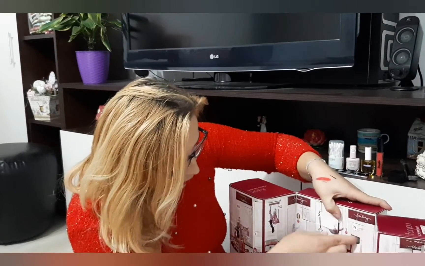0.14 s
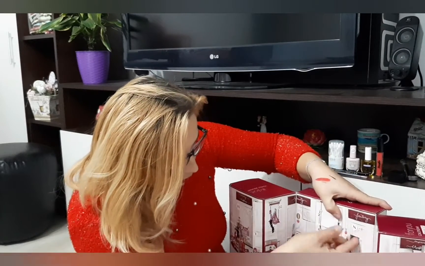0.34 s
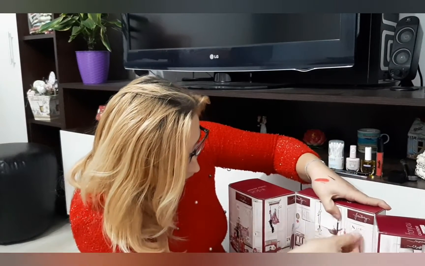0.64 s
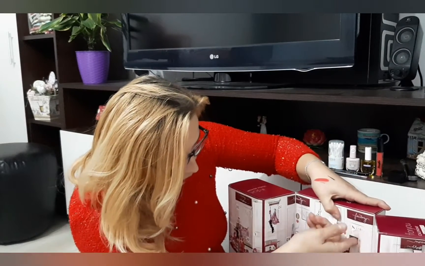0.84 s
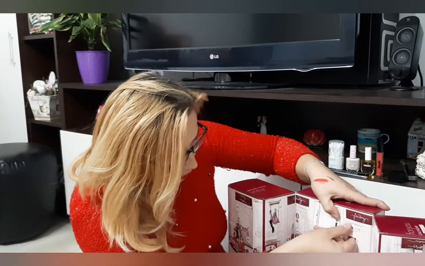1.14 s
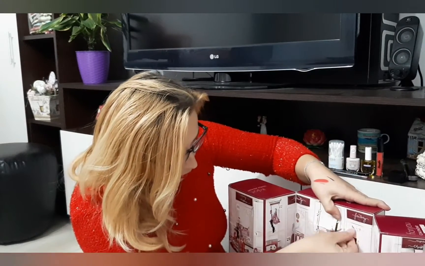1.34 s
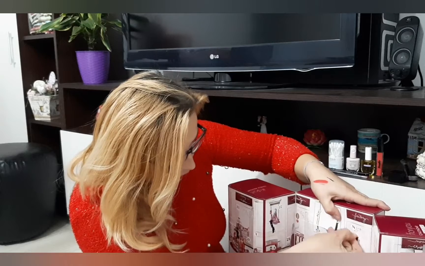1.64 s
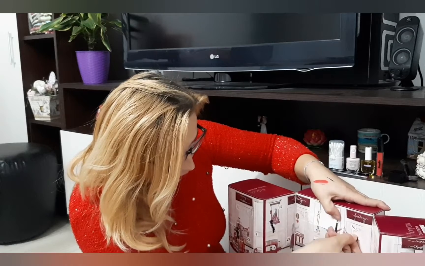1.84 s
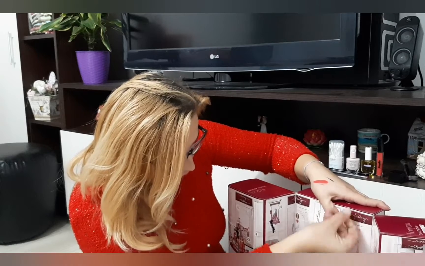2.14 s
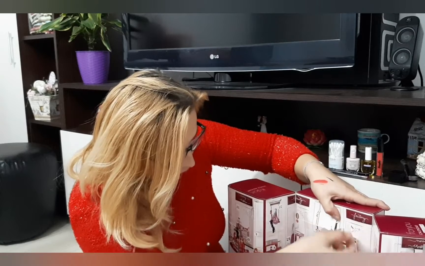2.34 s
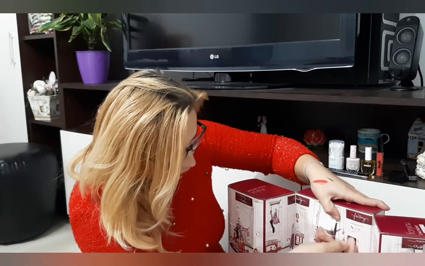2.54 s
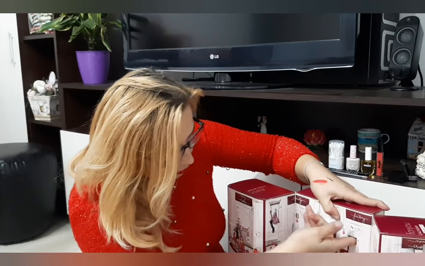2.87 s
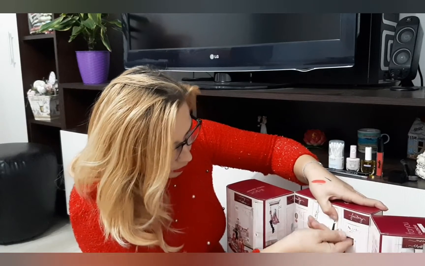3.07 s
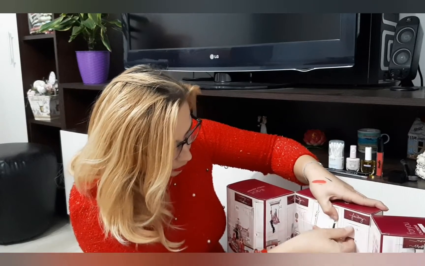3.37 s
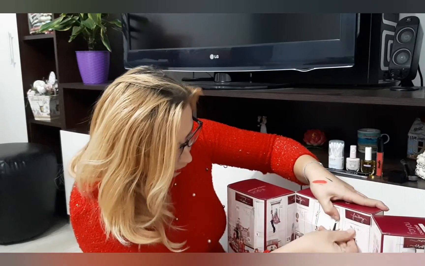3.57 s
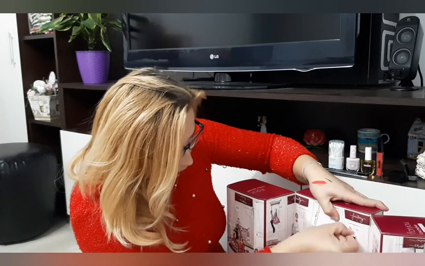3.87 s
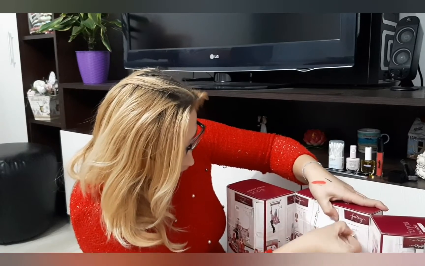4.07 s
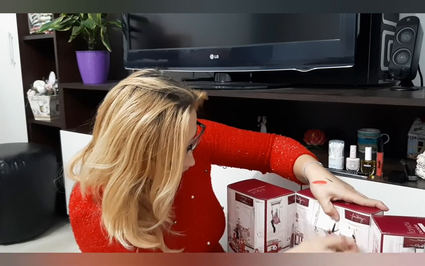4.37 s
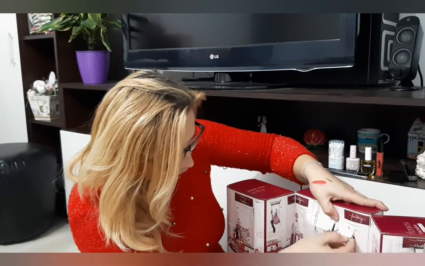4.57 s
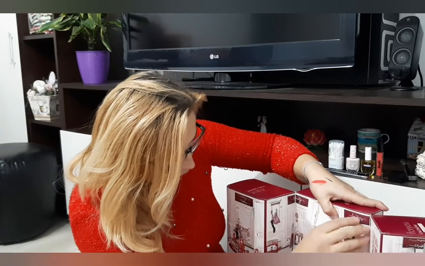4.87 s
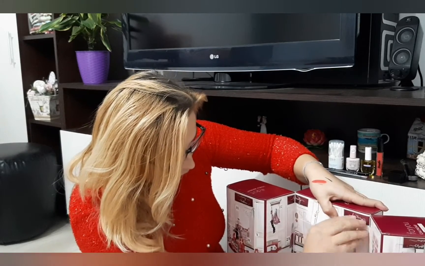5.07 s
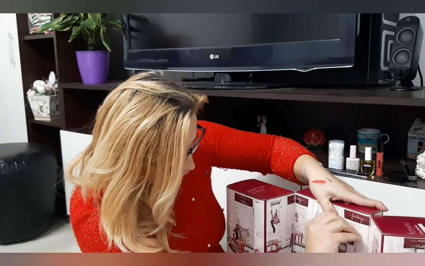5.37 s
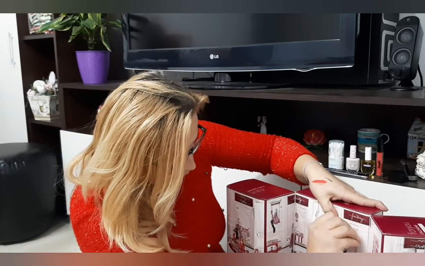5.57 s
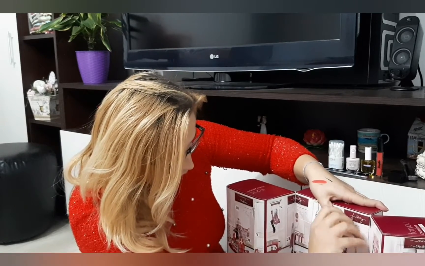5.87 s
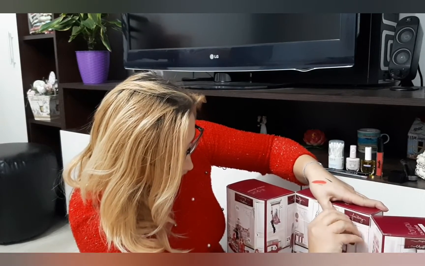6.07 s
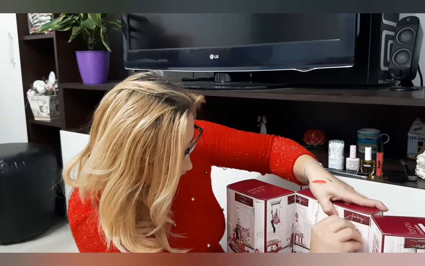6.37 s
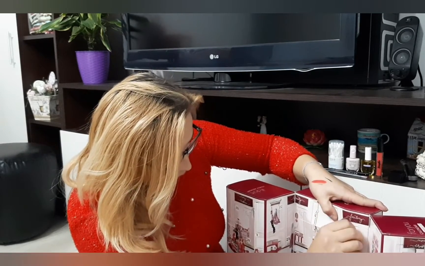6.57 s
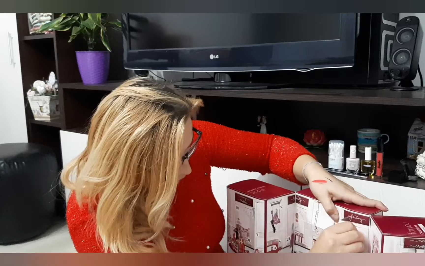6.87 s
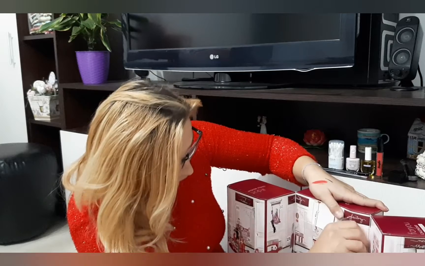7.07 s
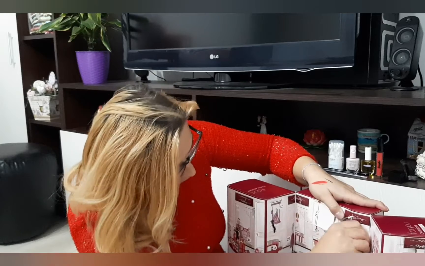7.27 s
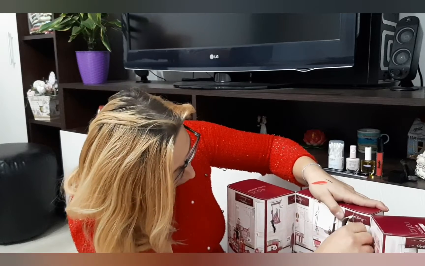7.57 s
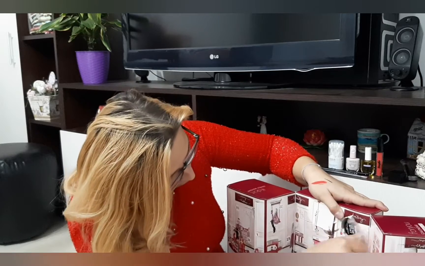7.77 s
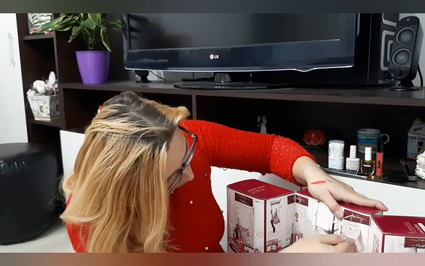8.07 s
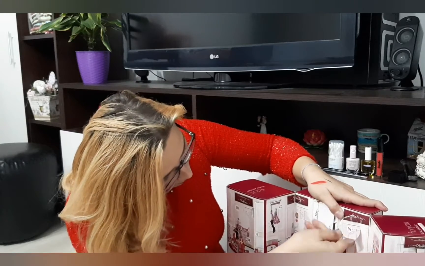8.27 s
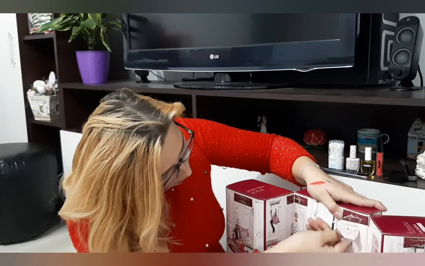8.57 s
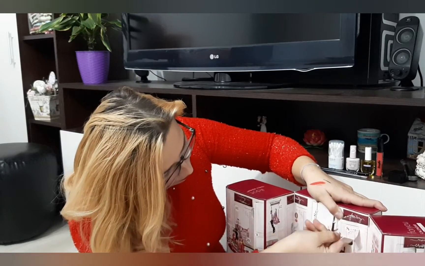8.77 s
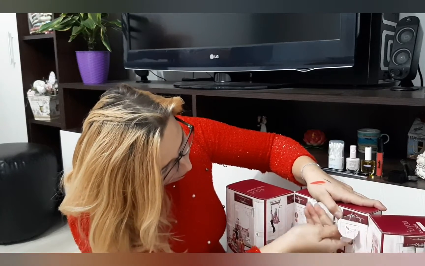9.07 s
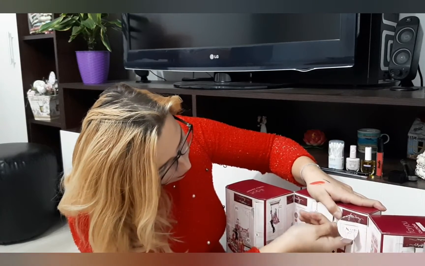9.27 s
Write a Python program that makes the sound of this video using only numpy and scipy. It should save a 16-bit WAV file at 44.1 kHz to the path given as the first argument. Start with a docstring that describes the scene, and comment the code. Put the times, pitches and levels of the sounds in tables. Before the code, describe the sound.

Close, dry fumbling on a hollow card box: nails click, fingertips rub, and perforations snap now and then in a quiet living room.

```python
"""A living room, two close microphones, a hollow cardboard calendar with a perforated door, a little to the right.
From the start a faint floor of air and hiss lies under a hand that keeps brushing the box. Within 0.1 s nails
catch and flick (noise bursts with a click), drag the card (ringing noise) and fingers rub it (stick and slip).
From about 0.5 s paper ties snap now and then among these touches, up to the end at 9.4 s.
Catches, snaps and rubbing ring the box at its hollow modes; every touch leaves a short room tail."""
import sys
import numpy as np
from scipy import signal
from scipy.io import wavfile
from scipy.ndimage import uniform_filter1d

SR = 44100
rng = np.random.default_rng(int(sys.argv[2]) if len(sys.argv) > 2 else 0)


def transcribe(u):
    """Save the signal u as a 16-bit wav file named by the first command-line argument.

    u: samples, shape (n,) or (channels, n), limited to [-1, 1]; the rate is SR.
    q: integer samples, one column per channel.
    """
    v = np.clip(np.atleast_2d(u).T, -1, 1)
    q = np.round(v * 32767).astype(np.int16)
    wavfile.write(sys.argv[1], SR, q)


N = 415510
TIME = np.arange(N) / SR

# All sound is built in half-octave bands below the cutoff: band edges and centres, f/Hz
CUTOFF_HZ = 16000
EDGES = CUTOFF_HZ * 2 ** (np.arange(-17, 1) / 2)
CENTRES = np.sqrt(EDGES[1:] * EDGES[:-1])

# Still air and microphone hiss: f/Hz, level per half octave/dB
AIR_AND_HISS = [(50, -103), (120, -85), (300, -100.5), (700, -96), (1500, -107), (4000, -80),
                (14000, -86.5)]
# Likeness of left and right microphone in sound from all sides: f/Hz, correlation
LIKENESS = [(100, 0.35), (300, 0.92), (600, 0.43), (1200, 0.11), (2500, 0.09), (14000, 0.17)]

# Touch levels below are relative: colours and the mix in scene() are added to them.
# strength: midrange level; weight: bass against midrange, how far the finger flexes the panel;
# sharpness: top octave against midrange, nail edge high, fingertip low.
# Steadying hand brushing the box between strokes: t/s, strength/dB
RESTING_HAND = [(0, -71), (0.72, -78.5), (1.0, -72.5), (2.4, -75), (2.55, -92), (2.8, -70), (3.2, -76),
                (4.3, -57), (4.5, -72.5), (5.3, -73), (5.9, -80), (6.6, -64.5), (6.87, -83), (7.1, -83),
                (7.6, -69.5), (7.88, -94), (8.12, -73.5), (9.2, -74.5)]
RESTING_WEIGHT_DB, RESTING_SHARP_DB = -7.5, -6.5
# Strokes of a finger or nail over the card: t/s, length/s, strength/dB, weight/dB, sharpness/dB
STROKES = [(0.051, .15, -57.5, -3, -25), (0.459, .12, -60, -12, -11.5), (0.8134, .1, -60, -14, -6),
           (0.912, .07, -55, -3, -9.5), (1.026, .33, -57, -4, -15.5), (1.359, .06, -51.5, -8, -9.5),
           (1.475, .08, -63, 1.5, -13), (1.614, .16, -60.5, 3, -4), (1.848, .14, -67.5, -2, -12),
           (2.049, .05, -58, -4.5, -17), (2.133, .09, -49.5, 2.5, -13), (2.58, .14, -73, -12, -11.5),
           (2.872, .04, -64, 2, 0), (2.913, .11, -54, 3, -12.5), (3.269, .13, -69, -7, -15),
           (3.444, .16, -59.5, -9, -13.5), (3.651, .07, -50.5, -14, -15), (3.741, .17, -60, 2, -2.5),
           (3.93, .06, -50, 2.5, -1.5), (4.095, .11, -65, -10, 4.5), (4.209, .08, -49, -18.5, 2),
           (4.298, .07, -50.5, -21, -20), (4.637, .13, -66.5, -8.5, -13), (4.941, .06, -54, -13, -17),
           (5.091, .12, -57.5, -16.5, -20), (5.306, .04, -56, -7, -8.5), (5.433, .07, -59, -14, -6.5),
           (5.508, .11, -64, -10, 1.5), (5.687, .06, -55.5, -24, -15), (5.75, .04, -58, 1.5, -1.5),
           (5.956, 0.13, -63.5, -11, -15.5), (6.12, .14, -59.5, -30, -8.5), (6.32, .04, -52, 0.5, 2),
           (6.442, .14, -67.5, -6, -1.5), (6.68, .11, -62.5, -10.5, 8.5), (6.914, .07, -68, -10.5, 3.5),
           (6.983, .1, -59.5, -4.5, -6), (7.116, .08, -60.5, -17, -2.5), (7.214, .07, -56, -1, 0),
           (7.4216, .12, -65, -31, 5.5), (7.678, .09, -64, -30, 3.5), (7.945, .05, -66.5, -8, -12.5),
           (8.222, .1, -65, -1.5, -7), (8.34, .07, -55.5, -4.5, -10), (8.415, .05, -88, -14, -27),
           (8.532, .14, -61.5, -12, -31), (8.69, .22, -60.5, -19.5, -27), (8.98, .07, -61, -7, -16),
           (9.25, .04, -53, -36, -43), (9.337, .08, -59, -17, -20.5)]
# A stroke swells, eases off as it goes, and dies when the finger lifts
ATTACK_S, EASE_DB, RELEASE_S = .012, 4, .009
# Tick where a stroke lands and random catches on fibres: level against the stroke, half-range of the catches
LANDING_DB, CATCH_DB, CATCH_SPREAD_DB = -1.1, 0.3, 3.5
# Colour of a touch at zero weight and sharpness: f/Hz, level/dB
TOUCH_COLOUR = [(80, -4), (190, 0.3), (280, 1), (420, -0.4), (650, 1.5), (1500, -0.5), (3000, 0), (5000, 1),
                (13000, -1)]
# How much of the weight reaches each frequency: f/Hz, share
WEIGHT_SHARE = [(80, 1.1), (200, 1.01), (350, 0.87), (650, 0.33), (1500, 0.0047)]
# How much of the sharpness reaches each frequency: f/Hz, share
SHARPNESS_SHARE = [(650, -.05), (1700, 0.11), (5000, 0.67), (13000, 1)]
# How the card radiates sliding: f/Hz, level/dB
SLIDE_COLOUR = [(50, -13), (100, -14), (200, -12.5), (350, -2.5), (650, -1.5), (1300, 0), (2800, 2),
                (4500, 4), (6500, 5), (9500, -5), (14000, 10)]

# Nail catches and flicks: t/s, strength/dB, weight/dB, sharpness/dB
CONTACTS = [(0.017, -40.5, -4, -2), (0.0447, -29.5, -8.5, -10.5), (0.08, -38.5, -40, -9.5),
            (0.1255, -32, -22, -10), (0.283, -63, 7, -13), (0.444, -41, -24, -31), (0.562, -55, -7, -34),
            (0.958, -59.5, 8, 1.5), (1.1302, -48.5, -5, -16), (1.158, -45.5, -9, -22),
            (1.386, -44, -12, -12), (1.3966, -37, -21, -18), (1.5475, -54, 4, 2), (1.611, -43, -14.5, -0.5),
            (2.101, -32.5, -11, -13.5), (2.1178, -39, -8.5, -9.5), (2.1207, -25, -10, -18),
            (2.574, -69, -23, -2), (2.6512, -57, -10.5, -44.5), (3.134, -54, -6, -14),
            (3.43, -40.5, -14.5, -22.5), (3.609, -48.5, -5, -28), (3.634, -50, 1.5, -16),
            (3.6444, -31.5, -26, -7.5), (3.756, -63, 13, -10), (3.828, -54, -3, -25),
            (3.924, -38.5, 2, -10.5), (3.942, -33, -25, -13), (4.172, -44, -30, -13),
            (4.5455, -50, -12, -18), (4.624, -35, -25, -17), (4.8837, -53.5, -14, -18.5),
            (4.934, -46.5, -20, -21), (5.082, -47, -35, -24), (5.1511, -48, -28, -22.5),
            (5.2381, -48.5, -32, -27), (5.5074, -57, -37, -4), (5.5554, -48, -35, -1.5),
            (5.744, -37.5, -21, -16), (6.154, -56.5, -15, 4.5), (6.2705, -39, -47, 0),
            (6.277, -41, -21, 3.5), (6.3039, -37.5, -2.5, 4), (6.4476, -55.5, -25, 1),
            (6.7001, -54, -16, -5), (7.2106, -34, -21, -3), (7.2289, -39, -13, -5.5),
            (7.281, -46, -33, 2.5), (7.934, -53.5, -14, -13.5), (8.5281, -49.5, -33, -38),
            (8.569, -52.5, -15, -21.5), (8.9691, -49.5, -18, -21), (9.021, -50.5, -7, -9),
            (9.3378, -51.5, -19, -31)]
CONTACT_S = .01  # contact and tie levels are rms over this time
# Thump, knock, tap, crack and top octave of a contact: f/Hz, decay time before slowing/s
PARTS = [(190, 0.011), (650, 0.0037), (1900, 0.0039), (5300, 0.0018), (13000, 0.003)]
# Final click against the crackle of fibres: f/Hz, amplitude ratio
CLEAN_BREAK = [(300, 0.48), (1500, 0.64), (5000, .7), (13000, 0.74)]
# How the card radiates contacts: f/Hz, level/dB
CONTACT_COLOUR = [(50, -20), (100, -16.5), (200, -5.5), (350, -4), (700, -4), (1300, -1.5), (2800, 1),
                  (4500, 4), (6500, 3.5), (9500, -2), (14000, 11)]

# A dragging nail or finger sets one part of the card singing: t/s, length/s, f/Hz, width/Hz, level/dB
DRAGS = [(0.042, 0.09, 1900, 350, -37.5), (0.043, 0.029, 606, 97, -37), (0.123, 0.016, 964, 150, -24),
         (1.392, 0.039, 1740, 59, -38), (1.395, 0.0083, 3100, 630, -33), (2.115, 0.021, 1105, 220, -22.5),
         (2.988, 0.038, 164.4, 13, -42.5), (3.919, 0.037, 96, 26, -45), (4.536, 0.024, 1560, 200, -45),
         (4.531, 0.022, 2960, 280, -47.5), (5.29, 0.023, 2170, 220, -48.5), (5.548, 0.03, 1460, 170, -42.5),
         (7.205, 0.044, 1940, 200, -36.5), (7.447, 0.012, 1500, 130, -54), (7.497, 0.036, 1400, 340, -53),
         (7.684, 0.052, 1220, 300, -53.5), (7.748, 0.029, 660, 69.6, -53.5), (8.535, 0.047, 1970, 900, -72),
         (8.694, 0.14, 2250, 1500, -57.5), (8.809, 0.21, 2580, 280, -66), (8.98, 0.1, 5940, 410, -47),
         (9.016, 0.037, 423, 180, -45), (9.243, 0.033, 1806, 360, -55.5), (9.336, 0.059, 2410, 440, -59)]

# Paper ties of the perforation snap: t/s, level/dB
TIES = [(0.457, -39.5), (1.6498, -39), (2.1171, -25.5), (3.924, -40), (4.094, -47), (4.15, -39.5),
        (6.3044, -27), (8.9691, -27.5)]
# Spectrum shared by all ties: f/Hz, level/dB
TIE_COLOUR = [(200, -42.5), (1500, -17.5), (3000, -7.5), (4000, -6.5), (6000, -5), (8000, -5.5),
              (13000, -21.5)]

# Modes of the hollow box: f/Hz, width/Hz, lift/dB
BOX_MODES = [(170, 11, 6), (340.6, 24.2, 10.5), (446.5, 8.3, 5.5), (615.5, 88, 9.5), (729, 12.7, 9),
             (862, 6.5, 5.5), (1113, 110, 4), (1534, 29, 8), (2064, 31, 5.5)]
# Decay of the room: f/Hz, time to fall 60 dB/s
ROOM_T60 = [(100, 0.22), (400, 0.22), (1200, 0.27), (5000, 0.26), (14000, 0.22)]
# Room tail against the sound that feeds it: f/Hz, level/dB
ROOM_LEVEL = [(100, -8.5), (400, -1.5), (1200, 2), (5000, -0.33), (14000, 0.5)]


def from_db(db):
    """Decibels to gain."""
    return 10 ** (np.asarray(db) / 20)


def rms_one(x):
    """Scale each row to rms 1."""
    return x / np.sqrt(np.mean(x ** 2, axis=-1, keepdims=True) + 1e-20)


def energy_one(x):
    """Scale each row to energy 1."""
    return rms_one(x) / np.sqrt(x.shape[-1])


def at_hz(points, hz):
    """Read a (f/Hz, value) table on a log-frequency axis."""
    freqs, values = np.transpose(points)
    return np.interp(np.log(hz), np.log(freqs), values)


def band(x, k):
    """The k-th half-octave band."""
    sos = signal.butter(2, EDGES[k:k + 2], "band", fs=SR, output="sos")
    return signal.sosfilt(sos, x + 1e-18)


def peak(x, hz, width_hz, lift_db):
    """A resonance (or a dip) on an otherwise flat response."""
    half = np.tan(np.pi * width_hz / SR)
    cosine = np.cos(2 * np.pi * hz / SR)
    gain = from_db(lift_db)
    zeros = [1 + half * gain, -2 * cosine, 1 - half * gain]
    poles = [1 + half, -2 * cosine, 1 - half]
    return signal.lfilter(zeros, poles, x)


def drift(rate):
    """Random values of spread 1, drawn `rate` times a second and joined by straight lines."""
    knots = rng.standard_normal(N // 10)
    return np.interp(TIME * rate, np.arange(len(knots)), knots)


def diffuse(k, size):
    """One band of noise from all sides, as two close microphones hear it."""
    alike = np.clip(at_hz(LIKENESS, CENTRES[k]), -.99, .99)
    mid, side = rms_one(band(rng.standard_normal((2, size)), k))
    return np.sqrt(1 + alike) * mid + np.sqrt(1 - alike) * side * [[1], [-1]]


def floor():
    """Still air and microphone hiss: steady noise from all sides, levelled band by band."""
    return sum(from_db(at_hz(AIR_AND_HISS, hz)) * rms_one(diffuse(k, N)) for k, hz in enumerate(CENTRES))


def touch_db(touches, hz):
    """Level at one frequency of touches whose last columns are strength, weight and sharpness."""
    strength_db, weight_db, sharp_db = np.transpose(touches)[-3:]
    bass_db = weight_db * at_hz(WEIGHT_SHARE, hz)
    treble_db = sharp_db * at_hz(SHARPNESS_SHARE, hz)
    return strength_db + at_hz(TOUCH_COLOUR, hz) + bass_db + treble_db


def pressure(times):
    """Envelope of every stroke (rows) at the given times: attack, easing hold, release."""
    start, length = np.transpose(STROKES)[:2, :, None]
    age = np.maximum(times - start, 0)
    attack = np.minimum(age / ATTACK_S, 1)
    easing = from_db(-EASE_DB * np.minimum(age / length, 1))
    release = np.exp(-np.maximum(age - length, 0) / RELEASE_S)
    return attack * easing * release


def stick_and_slip(slips_per_s=300, size_db=5.0, slip_s=.0009, steady=.35):
    """Uneven tiny releases at random moments, each dying exponentially, over a smooth rub."""
    sizes = from_db(size_db * np.minimum(rng.exponential(1, N), 4))
    slips = (rng.random(N) < slips_per_s / SR) * sizes
    releases = signal.lfilter([1], [1, -np.exp(-1 / (slip_s * SR))], slips + 1e-18)
    friction = rms_one(releases) + steady
    # a big slip spends the strain that its neighbours would have released
    return friction / np.sqrt(uniform_filter1d(friction ** 2, size=SR // 25))


def sliding(grip_db=1.5, grip_rate=45):
    """Resting hand and strokes: stick-slip noise swelling with the grip, coloured by weight and sharpness."""
    times = TIME[::SR // 500]
    power = pressure(times) ** 2
    resting_db = np.interp(times, *np.transpose(RESTING_HAND))
    grip = from_db(grip_db * drift(grip_rate))
    # two independent noises, so neighbouring bands are unrelated
    forces = stick_and_slip() * grip * rng.standard_normal((2, N))
    out = np.zeros(N)
    for k, hz in enumerate(CENTRES):
        resting = from_db(resting_db + touch_db((0, RESTING_WEIGHT_DB, RESTING_SHARP_DB), hz))
        stroke_power = from_db(touch_db(STROKES, hz)) ** 2 @ power
        gain = np.interp(TIME, times, np.sqrt(stroke_power + resting ** 2))
        out += from_db(at_hz(SLIDE_COLOUR, hz)) * gain * rms_one(band(forces[k % 2], k))
    return out


def contacts(starts, levels, grain_db=2.5, give=0.54, soft_db=-45, slowing=0.064, crack_hz=4800):
    """Fibres give way one after another, then break with a click; the low flexing of the panel outlasts the crack."""
    lead, give_s = SR // 160, .001  # samples ahead of the click; build-up time of the giving fibres
    age = (np.arange(SR // 24) - lead) / SR
    fibres = from_db(grain_db * rng.standard_normal((len(starts), len(age))))
    forces = fibres * rng.standard_normal((2, *fibres.shape))  # neighbouring bands get unrelated noise
    # a touch with little crack is drawn out
    crack_db = levels[np.searchsorted(EDGES, crack_hz) - 1]
    slowness = 0.5 + slowing * np.clip(soft_db - crack_db, 0, 20)[:, None]
    bursts = 0
    for k, hz in enumerate(CENTRES):
        giving = give * np.exp(-abs(age) / give_s)
        dying = np.exp(-abs(age) / (at_hz(PARTS, hz) * slowness))
        crackle = energy_one(forces[k % 2] * np.where(age < 0, giving, dying))
        # alternating signs let the click join across neighbouring bands
        click = at_hz(CLEAN_BREAK, hz) * (age == 0) * (-1) ** k
        gain = from_db(levels[k] + at_hz(CONTACT_COLOUR, hz))[:, None] * np.sqrt(CONTACT_S * SR)
        bursts = bursts + gain * energy_one(band(crackle + click, k))
    out = np.zeros(N + len(age))
    for start, burst in zip(starts, bursts):
        at = np.clip(int(start * SR) - lead, 0, N)
        out[at:at + len(age)] += burst
    return out[:N]


def drags(skew=0.36):
    """Friction noise in one resonance of the card, swelling fast and fading as the finger lets go."""
    out = np.zeros(N + SR)
    for start, length, hz, width_hz, level_db in DRAGS:
        progress = np.minimum(np.arange(SR // 4) / SR / length, 1)
        force = np.sin(np.pi * progress ** skew) * rng.standard_normal(len(progress))
        radius = np.exp(-np.pi * width_hz / SR)
        poles = [1, -2 * radius * np.cos(2 * np.pi * hz / SR), radius ** 2]
        ring = signal.lfilter([1, 0, -1], poles, force)
        at = int(start * SR)
        out[at:at + len(ring)] += from_db(level_db) * energy_one(ring) * np.sqrt(length * SR)
    return out[:N]


def small_ticks(count=110):
    """A tick where each stroke lands and random catches along the strokes, as rows like those of CONTACTS."""
    start, length, strength_db, weight_db, sharp_db = np.transpose(STROKES)
    landings = np.column_stack([start, strength_db + LANDING_DB, weight_db, sharp_db])
    place, size = rng.random((count, 2)).T
    # lay the strokes end to end and scatter the catches evenly along them
    travelled = np.cumsum(length)
    along = (np.arange(count) + place) / count * travelled[-1]
    k = np.searchsorted(travelled, along)
    catch_s = start[k] + length[k] - (travelled[k] - along)
    catch_db = strength_db[k] + CATCH_DB + CATCH_SPREAD_DB * (2 * size - 1)
    catches = np.column_stack([catch_s, catch_db, weight_db[k], sharp_db[k]])
    return np.vstack([landings, catches])


def with_snapping_ties(touches):
    """Start times and band levels (bands x events) of the touches, followed by ties that share one spectrum."""
    tie_s, tie_db = np.transpose(TIES)
    levels = [np.append(touch_db(touches, hz), tie_db + at_hz(TIE_COLOUR, hz)) for hz in CENTRES]
    return np.append(touches[:, 0], tie_s), np.array(levels)


def box(x):
    """The panels and the air inside ring at their modes."""
    for hz, width_hz, lift_db in BOX_MODES:
        x = peak(x, hz, width_hz, lift_db)
    return x


def direct(x, left_db=-3.5, right_db=1.5):
    """The box stands to the right: the left microphone hears it later and weaker."""
    lag = 5  # samples
    left = from_db(left_db) * np.pad(x, (lag, 0))[:N]
    return np.array([left, from_db(right_db) * x])


def wandering(move_rate=25, count=3):
    """The sounding spot moves over the card, so the faces take changing shares of mean power 1."""
    shares = np.array([drift(move_rate) for _ in range(count)])
    return shares / np.sqrt(np.mean(shares ** 2, axis=0))


def reflections(first_s=0.00099, build_s=0.00028):
    """Echoes build up from the other panels, the shelves and the floor, then die band by band."""
    age = np.arange(SR // 3) / SR
    onset = 1 - np.exp(-np.maximum(age - first_s, 0) / build_s)
    tail = 0
    for k, hz in enumerate(CENTRES):
        decay = from_db(-60 * age / at_hz(ROOM_T60, hz))
        echoes = energy_one(diffuse(k, len(age)) * onset * decay)
        share = 2 * (EDGES[k + 1] - EDGES[k]) / SR  # of the whole spectrum
        tail = tail + echoes * np.sqrt(share) * from_db(at_hz(ROOM_LEVEL, hz))
    return tail


def room(faces):
    """Each face of the box sends its sound along its own pattern of echoes."""
    tails = [signal.oaconvolve(face[None], reflections(), axes=1)[:, :N] for face in faces]
    return sum(tails) / np.sqrt(len(faces))


def scene(contact_db=-3.5, slide_db=-4.0, drag_db=-5.0, lean_db=0.7, shade_db=-2.5, bend_db=3.0):
    """Touches sound from the box into the room; bass bends round to the left side, treble is shaded there."""
    # drags already carry their own resonance, so they bypass the box modes
    friction = box(from_db(slide_db) * sliding()) + from_db(drag_db) * drags()
    shares = wandering()
    starts, levels = with_snapping_ties(np.vstack([CONTACTS, small_ticks()]))
    # every face radiates its own grain
    cracks = np.array([box(from_db(contact_db) * contacts(starts, levels)) for _ in shares])
    heard = direct(cracks[0] + friction) + room(cracks + shares * friction)
    left, right = heard * from_db([[-lean_db], [lean_db]])
    left = peak(left, 13000, 5000, shade_db)
    left = peak(left, 73, 250, bend_db)
    return np.array([left, right]) + floor()


def record(dry):
    """The microphones lose deep bass and have a dip in the upper treble; the top is cut."""
    thinned = signal.sosfilt(signal.butter(2, 48, "high", fs=SR, output="sos"), dry)
    dipped = peak(thinned, 8750, 900, -12)
    dipped = peak(dipped, 10000, 1600, -5)
    return signal.sosfilt(signal.ellip(12, .1, 80, CUTOFF_HZ, fs=SR, output="sos"), dipped)


dry = scene()
out = record(dry)
transcribe(out)
```